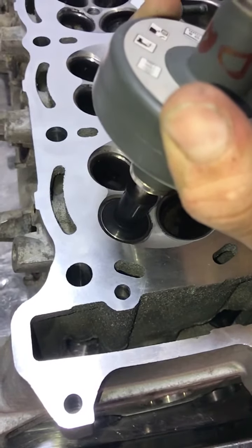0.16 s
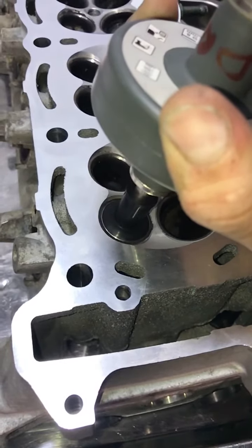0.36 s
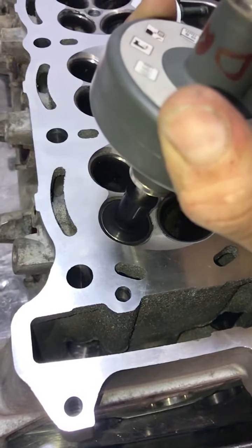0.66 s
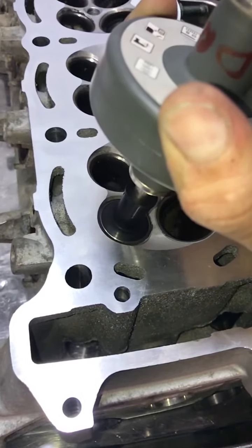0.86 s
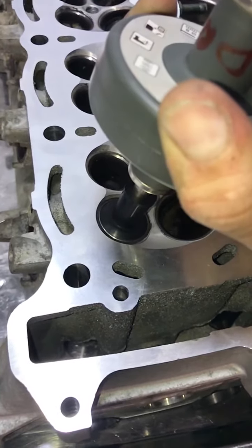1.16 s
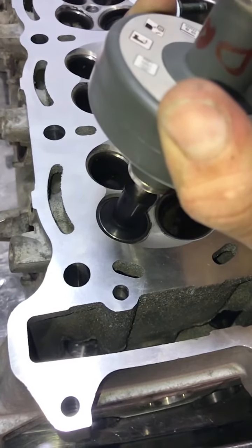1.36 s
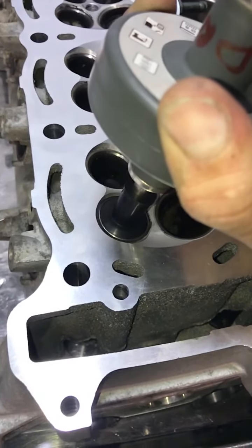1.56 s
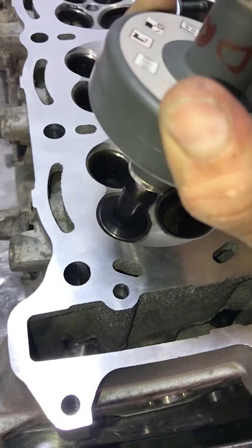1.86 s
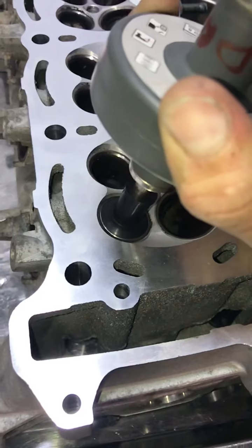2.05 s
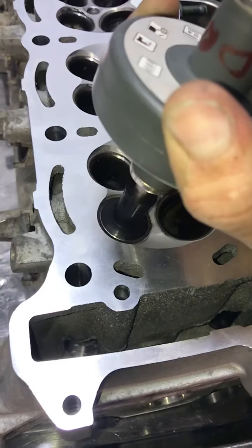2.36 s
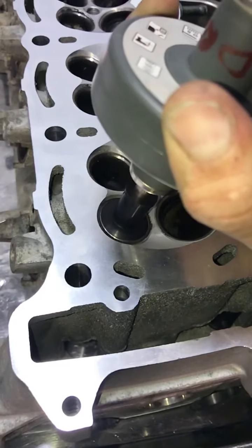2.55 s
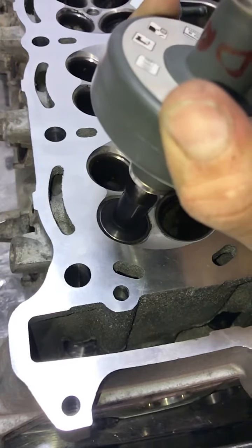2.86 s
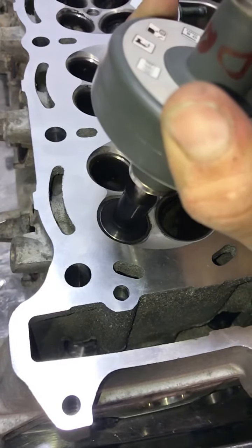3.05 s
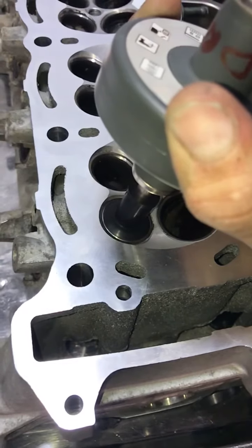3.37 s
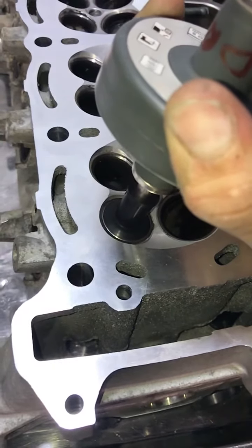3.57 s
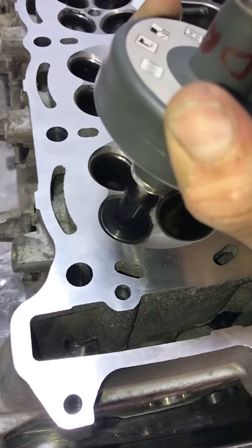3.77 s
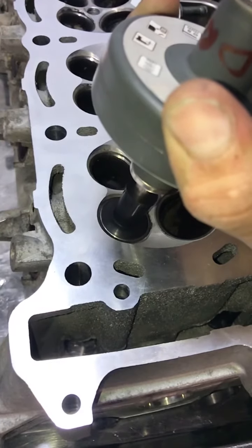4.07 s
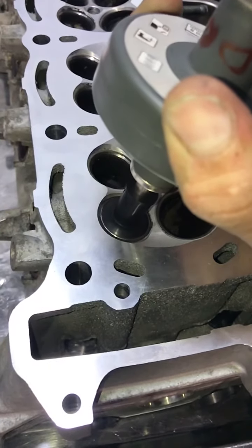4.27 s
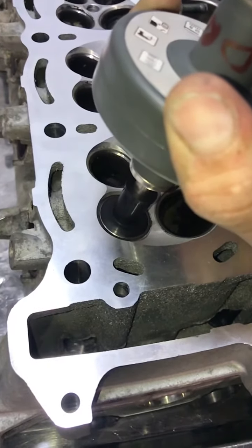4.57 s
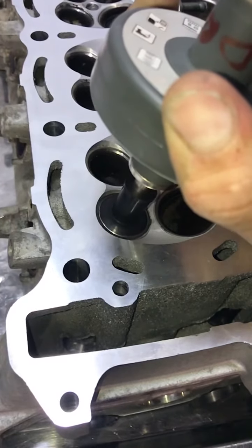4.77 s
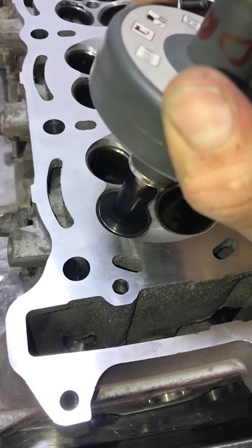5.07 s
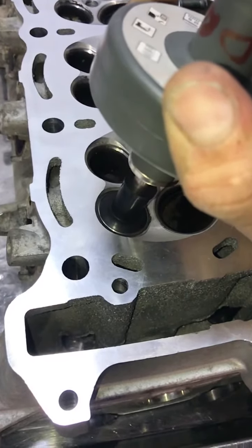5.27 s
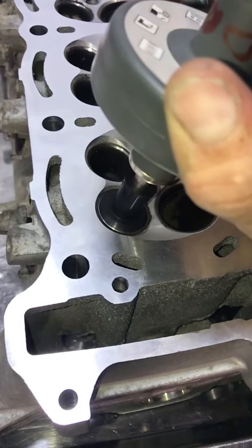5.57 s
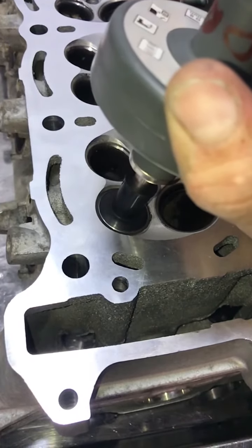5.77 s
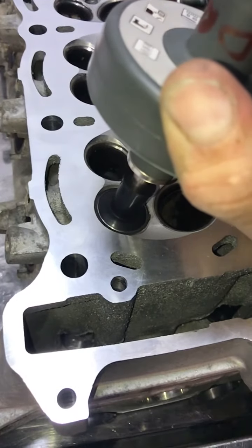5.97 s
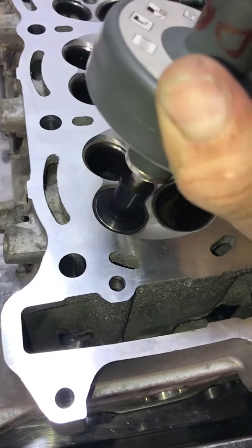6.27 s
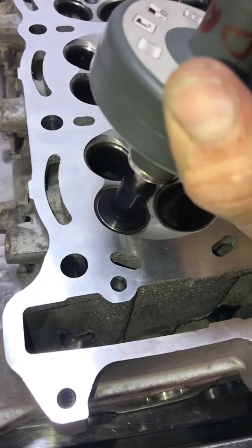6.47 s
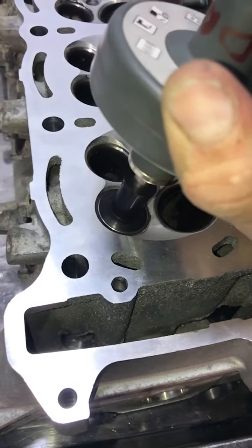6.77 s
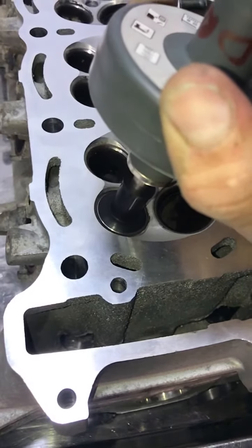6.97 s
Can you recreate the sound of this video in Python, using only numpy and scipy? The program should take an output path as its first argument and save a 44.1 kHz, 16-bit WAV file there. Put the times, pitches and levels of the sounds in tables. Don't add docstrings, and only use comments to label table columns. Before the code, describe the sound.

Dull, muffled grinding and slow gear ticks in a hand drill speed up into rattling whirr, with heavy metallic valve knocks ringing and rebounding.

```python
import sys
import numpy as np
from scipy import signal
from scipy.fft import rfft, irfft, next_fast_len
from scipy.io import wavfile
from scipy.ndimage import uniform_filter1d, minimum_filter1d, map_coordinates

SR = 44100
rng = np.random.default_rng(int(sys.argv[2]) if len(sys.argv) > 2 else 0)


def digitize_waveform(pressure):
    field = np.atleast_2d(pressure).T
    bounded = np.clip(field, -1, 1)
    quanta = np.round(bounded * 32767).astype(np.int16)
    wavfile.write(sys.argv[1], SR, quanta)


def invert_db(x):
    u = np.asarray(x, float) / 20
    return 10 ** u


N = 314433

# (frequency [Hz], width [Hz], level [dB])
HOUSING_MODES = [(712, 16, 1.5), (750, 50, 8), (825, 88, 5), (1172, 53, 3.5), (1458, 42, 2.5),
                 (1590, 52, -2.5), (1730, 47, -14), (1990, 180, -3)]
CASTING_MODES = [(371, 310, -3), (543.5, 48, 11.5), (543.5, 41, 12), (688.5, 17, 4), (749.5, 21, 0),
                 (857.4, 14, 2.5), (1084, 72, -7)]
TOOTH_MODES = [(980, 160, -10.5), (1710, 120, -9.5), (1690, 96, -4), (2097, 170, -1)]
BEARING_MODES = [(1615, 99, -3), (2090, 290, -1.5), (2092, 96, 11)]
SEAT_MODES = [(70, 30, -12), (100, 26, -5), (119, 16, 0), (168, 20, -5)]
GRIT_MODES = [(222.1, 54, 0.2), (291, 15, 3.56), (365, 64, -2.5)]
# (frequency [Hz], level [dB], t60 [s])
VALVE_MODES = [(328, 11.5, 0.062), (410, 5.5, 0.084), (514, 2, 0.076), (558, -2.5, 0.12),
               (725, -14.5, 0.039), (773, -4, 0.12), (876, -10.5, 0.31), (1000, -8, 0.13), (1185, -3, 0.1),
               (1251, -1, 0.055), (1430, -10, 0.023), (1572, 1.5, 0.067), (1830, -22.5, 0.1),
               (2077, 9, 0.017)]
# (frequency [Hz], density [dB per Hz])
WHIRR_COLOUR = [(530, -38.5), (900, -32), (985, -13), (1300, 6), (2070, 4.5), (2320, 17), (2400, -43),
                (3120, -62.5), (5280, -120)]
DRONE_COLOUR = [(250, -37), (400, 2.5), (550, 1.5), (800, 1.5), (1100, -0.5), (1500, -20)]
SHOP_COLOUR = [(8.8, -25), (15, -0.5), (176, -2), (264, -8.5), (554, -4), (1140, -17.5), (1320, -22.5),
               (1820, -20), (2110, -20), (2400, -25), (3120, -61), (5280, -120)]

# (time [s], speed [teeth/s])
DRILL_SPEED = [(0.0, 13.1), (1.78, 12.9), (1.85, 12.0), (1.97, 16.8), (2.13, 23.9), (2.28, 29.1),
               (2.97, 53.8), (3.57, 57.2), (4.78, 39.3), (5.15, 35.4), (5.43, 30.6), (5.84, 32.1),
               (5.86, 42.1), (6.12, 40.4), (6.21, 50.0), (6.61, 57.0), (6.74, 60.3), (7.13, 70.6)]
# (time [s], load [dB])
GEAR_LOAD = [(0, -35.5), (.27, -43), (.42, -50.5), (.57, -59), (.85, -49), (1.11, -45.5), (1.98, -42),
             (2.3, -31.5), (2.82, -31), (3.02, -26), (3.67, -28), (4.07, -30), (4.43, -31), (4.85, -34.5),
             (5.34, -33.5), (6.11, -32.5), (6.39, -26), (7.13, -27.5)]
# (teeth since the drop, whirr [dB], drone [dB], tick [dB], whine [dB], grit [dB])
CAM_TURN = [(0, -1.4, 0, 10, -12, 11.5), (4, 1.9, 2, 0.5, -14.5, -4.6), (8, -1.5, 1.5, -5.5, -2, -2.5),
            (11.1, -1.5, -0.6, -2.5, -13.5, -0.5), (18.1, -3, 0, 2.5, -8, 2.5), (25, .1, -1.05, 6, -7, 0.6),
            (31.8, -0.36, -0.5, 6.5, -11.5, 0), (39.5, -1.7, 1.1, 4, -9, 3.5)]
# (loaded stroke [dB], reached at [teeth], held for [teeth], valve halts at [teeth],
# return stroke [dB])
CAM_STROKES = [(-34.5, 5, 2, 27, -33.5), (-23, 5.5, 8.9, 18.5, -28.5), (-16, 5.9, 2.8, 25, -31),
               (-22.5, 4.6, 5.5, 11, -33), (-22, 5.4, 3.5, 17, -34.5), (-23.5, 5.1, 5.5, 17.2, -26.5),
               (-19, 5.4, 3.5, 24, -26), (-26, 2, 3, 18, -32)]

# (time [s], peak [dB], bright edge [dB], rebound after [s], rebound [dB])
FLAT_DROPS = [
    (2.26, -4, -9, .011, -21.5),
    (3.113, 4.7, -0.5, 0.027, -8),
    (3.76, 10.5, -3.5, .021, -10),
    (5.537, -4, -22, 0.0092, -25),
    (7.048, 5.5, -19, 0.023, -7),
]
EDGE_DROPS = [
    (4.52, -5.5, -6.5, .017, -13),
    (6.436, 5.5, -9, .014, -5),
]
CAM_SLAPS = [
    (3.359, 8.6, -10, .018, -8),
    (4.035, 2.7, -8.5, .018, -8),
    (6.689, 0.4, -11.5, .022, -10.5),
]
CAM_TAPS = [
    (.899, -31, -9.5, 0.03, -40.5),
    (5.954, -23, -24.5, 0.029, -36),
]
# (time [s], lost tip [dB])
FLAT_CRESTS = [
    (2.2625, -20),
    (3.1144, -12.5),
    (3.7692, -34),
    (6.6908, -20),
]

# (low body [dB], t60 at 0 dB peak [s], first blow [dB])
DROP, SLAP = (-5, 0.064, -5), (-33.5, 0.06, 0.1)
TAP, REBOUND = (6, 0.073, -5.5), (-2.5, 0.045, -5)
RIM_BODY_DB = -14
HARD_DAMPS_PER_DB, REBOUND_EDGE_DB = 0.083, -13
SETTLE_S, SETTLE_DB = 0.009, -30
LAST_FLIGHT_RATIO, LAST_HOP_DB = 0.97, -8

TOP_HZ = 2303
FIRST_TOOTH, CAM_TEETH, CAM_ZERO_TEETH = 0.94, 36.9, -3.5
DRONE_DB, DRONE_DB_PER_DB, MID_LOAD_DB = -30, 1, -31
IDLE_DRONE_DB = -47
LIGHT_TICK_DB_PER_DB, LIGHT_WHINE_DB_PER_DB = -0.05, -0.6
SPIN_UP_TICK_DB_S, SPIN_UP_MAX_PER_S = 2, 2.2
COAST_WHINE_DB, COAST_S = 7.5, 0.31
RISE_DB_PER_TOOTH, FALL_DB_PER_TOOTH = 3, 1.93
RETURN_AT_TEETH, RETURN_DB_PER_TOOTH = 28.6, 0.63
BITE_TEETH_PER_S, IDLE_DB_S = 16, 6
HALT_DB, HALT_TEETH, HALT_DRONE_SHARE = -6.5, 1.1, 0.35


def unit(x):
    return x / np.sqrt(np.mean(x ** 2) + 1e-20)


def curves(rows):
    time_s, *columns = np.transpose(rows)
    return [np.interp(np.arange(N) / SR, time_s, column) for column in columns]


def wobble(rate_hz):
    knots = rng.standard_normal(int(N / SR * 60) + 4)
    return map_coordinates(knots, [np.arange(N) * min(rate_hz, 59) / SR])


def filtered(x, response):
    m = next_fast_len(N + SR // 2)
    return irfft(rfft(x, m) * response(np.fft.rfftfreq(m, 1 / SR)), m)[:N]


def colour(points):
    point_hz, db = np.transpose(points)
    return lambda hz: invert_db(np.interp(np.log(hz + 1), np.log(point_hz), db, -120, -120))


def resonances(modes):
    def response(f):
        total = 0
        for k, (centre_hz, width_hz, db) in enumerate(modes):
            damping = 1j * f * width_hz
            total = total + (-1) ** k * invert_db(db) * damping / (centre_hz ** 2 - f * f + damping)
        return total
    return response


def shop():
    swell = invert_db(1.5 * wobble(5.6))
    return invert_db(-38.5) * swell * unit(filtered(rng.standard_normal(N), colour(SHOP_COLOUR)))


def shaft():
    speed, = curves(DRILL_SPEED)
    passed = FIRST_TOOTH + np.cumsum(speed) / SR
    turn, angle = np.divmod(passed - CAM_ZERO_TEETH, CAM_TEETH)
    return speed, passed, turn.astype(int), angle


def cam():
    teeth, *columns = np.transpose(CAM_TURN)
    angle = shaft()[3]
    return [np.interp(angle, teeth, column) for column in columns]


def halt():
    _, _, turn, angle = shaft()
    halt_at = np.array(CAM_STROKES)[turn, 3]
    return HALT_DB * np.exp(-((angle - halt_at) / HALT_TEETH) ** 2)


def gear_levels():
    load_db, = curves(GEAR_LOAD)
    whirr_db, drone_db, tick_db, whine_db, _ = cam()
    extra_db = load_db - MID_LOAD_DB
    growth = np.gradient(np.log(shaft()[0])) * SR
    growth = uniform_filter1d(np.clip(growth, 0, SPIN_UP_MAX_PER_S), size=4000)
    coast_db = COAST_WHINE_DB * np.exp(-(np.arange(N) / SR / COAST_S) ** 2)
    drone_db = DRONE_DB + DRONE_DB_PER_DB * extra_db + drone_db + HALT_DRONE_SHARE * halt()
    drone_db = 10 * np.log10(invert_db(2 * drone_db) + invert_db(2 * IDLE_DRONE_DB))
    tick_db = tick_db + LIGHT_TICK_DB_PER_DB * extra_db + SPIN_UP_TICK_DB_S * growth
    whine_db = whine_db + LIGHT_WHINE_DB_PER_DB * extra_db + coast_db
    return load_db + whirr_db, drone_db, tick_db, whine_db


def since_tooth():
    speed, passed = shaft()[:2]
    passed = passed + 0.0033 * speed
    return passed.astype(int), passed % 1 / speed


def tooth_ticks():
    tooth, age_s = since_tooth()
    size = invert_db(1.5 * rng.standard_normal(tooth.max() + 1)[tooth])
    rattle = invert_db(-60 * age_s / 0.021) * (1 - np.exp(-age_s / 0.00065)) * rng.standard_normal(N)
    touch = 11 * (np.diff(tooth, prepend=tooth[0]) > 0)
    ticks = filtered(size * (rattle + touch), lambda f: resonances(TOOTH_MODES)(f) + 0.24 * (f > 600))
    return ticks / np.sqrt(uniform_filter1d(ticks ** 2, SR // 4) + 1e-12)


def body_noise(points, modes, depth_db, rate_hz):
    noise = invert_db(depth_db * wobble(rate_hz)) * rng.standard_normal(N)
    return unit(filtered(noise, lambda f: colour(points)(f) * (0.5 + np.abs(resonances(modes)(f)))))


def gears():
    whirr_db, drone_db, tick_db, whine_db = gear_levels()
    ticks = tooth_ticks()
    whirr = body_noise(WHIRR_COLOUR, HOUSING_MODES, 2.3, 40)
    whine = unit(filtered(rng.standard_normal(N), lambda f: np.abs(resonances(BEARING_MODES)(f))))
    drone = body_noise(DRONE_COLOUR, CASTING_MODES, 2.4, 30)
    hum = np.sin(2 * np.pi * shaft()[1])
    box = whirr + invert_db(tick_db) * ticks + invert_db(whine_db) * whine + invert_db(-7.0) * hum
    return invert_db(whirr_db - 1.5) * box + invert_db(drone_db) * drone


def stroke_levels():
    speed, _, turn, angle = shaft()
    top_db, at, hold, _, back_db = np.array(CAM_STROKES)[turn].T
    rise_db = RISE_DB_PER_TOOTH * np.clip(at - angle, 0, None)
    fall_db = FALL_DB_PER_TOOTH * np.clip(angle - at - hold, 0, None)
    ahead_db = top_db - rise_db - fall_db
    idle_db = IDLE_DB_S * np.clip(BITE_TEETH_PER_S - speed, 0, None)
    back_db = back_db - RETURN_DB_PER_TOOTH * np.abs(angle - RETURN_AT_TEETH) - idle_db
    return 10 * np.log10(invert_db(2 * ahead_db) + invert_db(2 * back_db)) + halt(), cam()[4]


def steady(x):
    x = unit(x)
    power = uniform_filter1d(uniform_filter1d(x ** 2, size=700), size=700)
    return unit(x / (np.abs(power) + 0.054) ** 0.26)


def grinding():
    grind_db, grit_db = stroke_levels()
    slips = (rng.random((2, N)) < 800 / SR) * invert_db(1.0 * rng.standard_normal((2, N)))
    seat = filtered(slips[0], lambda f: resonances(SEAT_MODES)(f) / (1 + (f / 400) ** 2))
    grit = filtered(slips[1] + 0.84 * slips[0], lambda f: resonances(GRIT_MODES)(f) / (1 + (f / 700) ** 2))
    push = invert_db(2 * np.cos(2 * np.pi * shaft()[1] - 1.2))
    return invert_db(grind_db) * push * (steady(seat) + invert_db(grit_db + 0.5) * steady(grit))


def contacts():
    rows = []
    low_db, hop_t60_s, soft_db = REBOUND
    rim = np.add(DROP, [RIM_BODY_DB, 0, 0])
    kinds = ((FLAT_DROPS, DROP), (EDGE_DROPS, rim), (CAM_SLAPS, SLAP), (CAM_TAPS, TAP))
    for table, (body_db, t60_s, blow_db) in kinds:
        for s, db, edge_db, flight_s, again_db in table:
            life_s = t60_s * np.exp(-HARD_DAMPS_PER_DB * max(db, 0))
            rows.append((s, db, body_db, edge_db, life_s, blow_db))
            hops = [(SETTLE_S, db + SETTLE_DB), (flight_s, again_db),
                    (flight_s * (1 + LAST_FLIGHT_RATIO), again_db + LAST_HOP_DB)]
            for later_s, hop_db in hops:
                rows.append((s + later_s, hop_db, low_db, REBOUND_EDGE_DB, hop_t60_s, soft_db))
    return rows


def valve_ring(t, body_db, edge_db, life_s):
    hz, level_db, t60_s = np.transpose(VALVE_MODES)[:, :, None]
    chance = rng.standard_normal((3, len(VALVE_MODES), 1))
    tilt_db = np.interp(hz, [375, 536, 1230, 1550], [body_db, 0, 0, edge_db + 3.0])
    decay_db = 60 * t / (t60_s * life_s / 0.059)
    swell = 1 - np.exp(-t * hz / 0.41)
    pitch_hz = hz * (1 + 0.025 * chance[1])
    envelope = invert_db(level_db + tilt_db + 0.78 * chance[0] - decay_db) * swell
    return np.sum(envelope * np.sin(2 * np.pi * pitch_hz * t + 1.54 * chance[2]), 0)


def knocks():
    out, t = np.zeros(N + SR), np.arange(SR // 5) / SR
    thud = np.exp(-((t - 0.0016) / 0.00087) ** 2) * np.sin(2 * np.pi * 800 * t)
    snap = np.exp(-((t - 0.0022) / 0.00072) ** 2) * np.sin(2 * np.pi * 1750 * t)
    for s, db, body_db, edge_db, life_s, blow_db in contacts():
        life_s = np.clip(life_s, 0.01, 0.3)
        ring = valve_ring(t, body_db, edge_db, life_s)
        chatter = invert_db(-60 * t / (0.75 * life_s)) * rng.standard_normal(len(t))
        chatter = signal.lfilter([1, -1], [1, -1.8, 0.81], chatter)
        blow = invert_db(blow_db + 16) * (thud - invert_db(edge_db - 4.0) * snap)
        start = round((s + 0.0004) * SR)
        out[start:][:len(t)] += invert_db(db - 11.0) * (ring + 1.4 * chatter + blow)
    return out[:N]


def scene():
    return (shop() + gears() + grinding() + knocks())[None]


def band_limit(x):
    return signal.sosfilt(signal.butter(12, 16000, fs=SR, output="sos"), x)


def record(dry):
    slow = filtered(dry[0], lambda hz: invert_db(-np.clip((hz - 2150) / 12, 0, 14)) * (hz < TOP_HZ))
    need = minimum_filter1d(0.97 / np.maximum(np.abs(slow), 0.97), size=161)
    slow = slow * uniform_filter1d(uniform_filter1d(need, size=80), size=80)
    slow = slow - invert_db(-34) * slow ** 3
    for s, db in FLAT_CRESTS:
        tip = invert_db(db) * np.clip(1 - ((np.arange(N) / SR - s) / 0.000073) ** 2, 0, 1)
        slow = slow - filtered(tip, lambda hz: hz > TOP_HZ)
    mix = np.clip(slow, -1, 1)[None]
    return band_limit(mix)


dry = scene()
out = record(dry)
digitize_waveform(out)
```